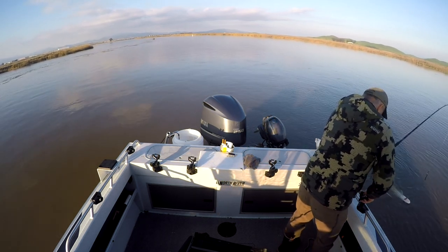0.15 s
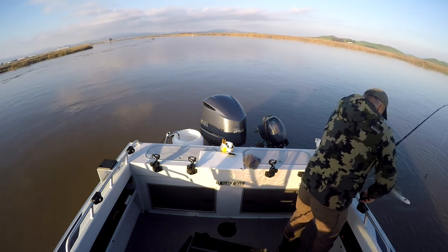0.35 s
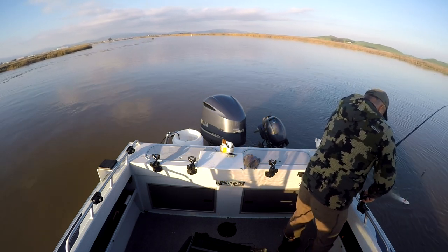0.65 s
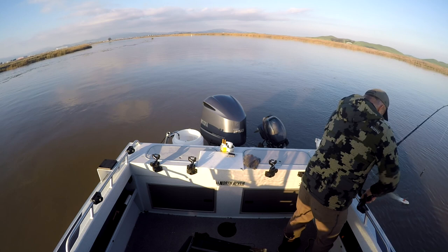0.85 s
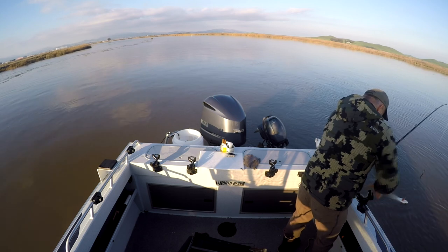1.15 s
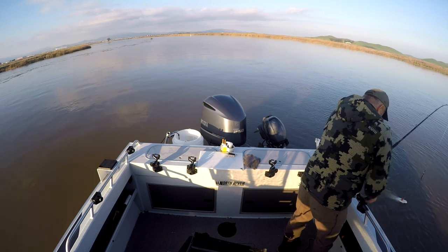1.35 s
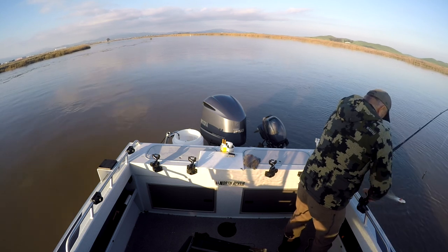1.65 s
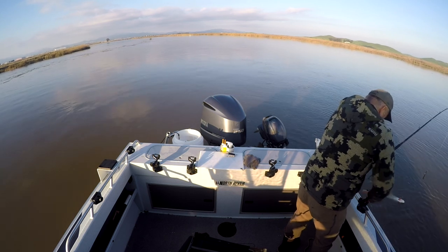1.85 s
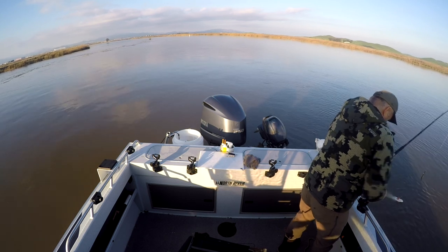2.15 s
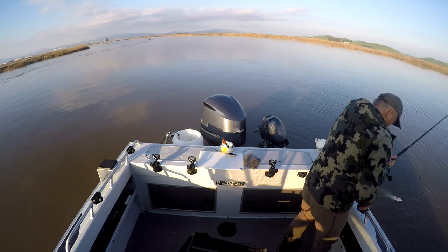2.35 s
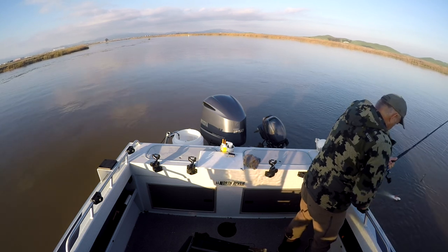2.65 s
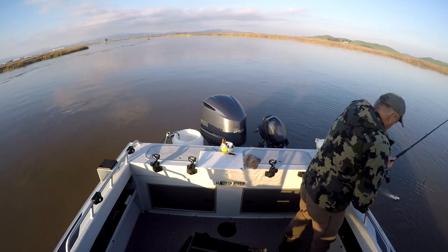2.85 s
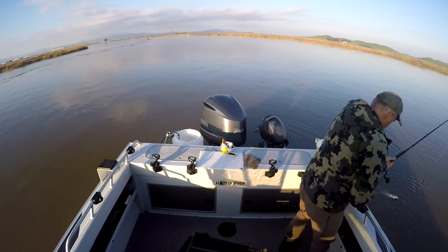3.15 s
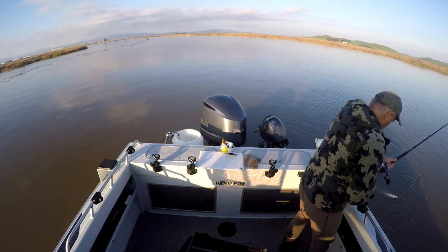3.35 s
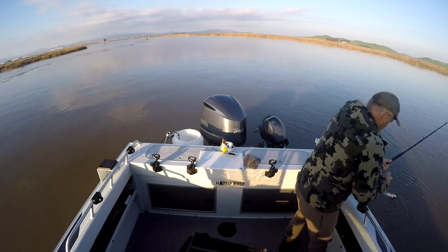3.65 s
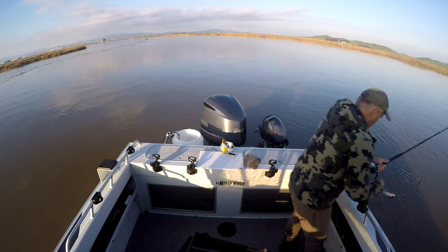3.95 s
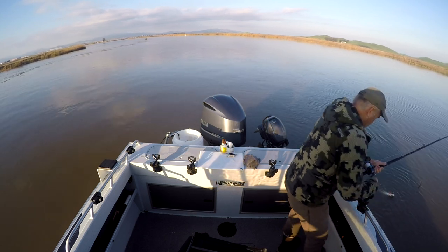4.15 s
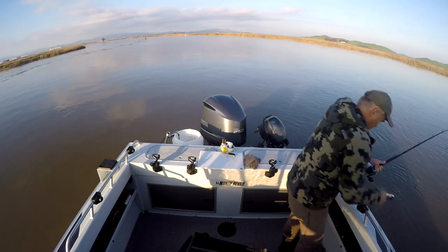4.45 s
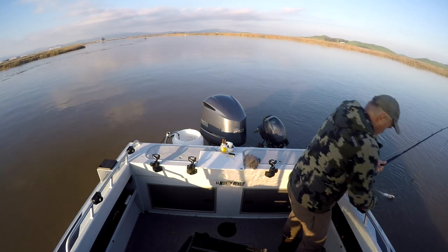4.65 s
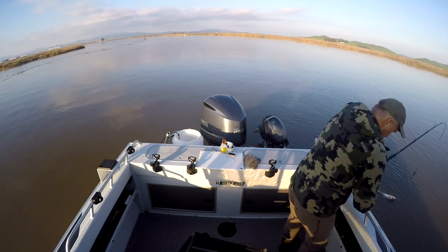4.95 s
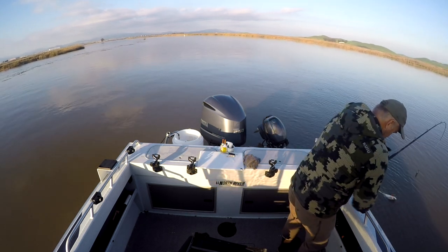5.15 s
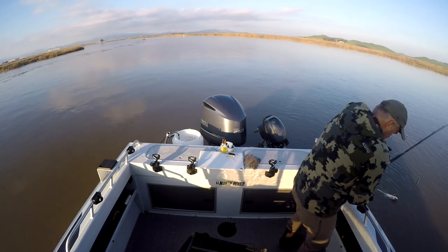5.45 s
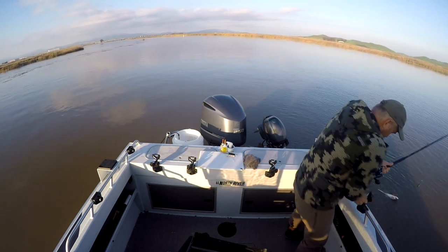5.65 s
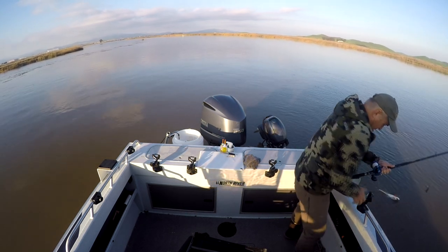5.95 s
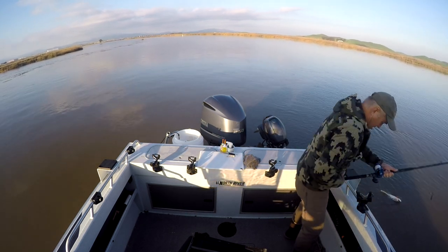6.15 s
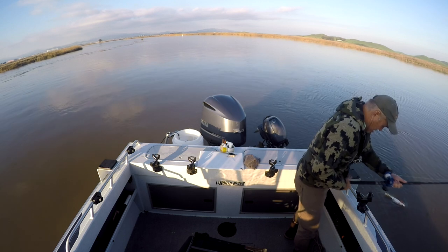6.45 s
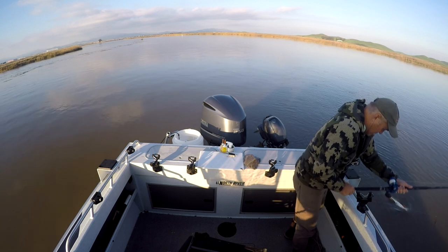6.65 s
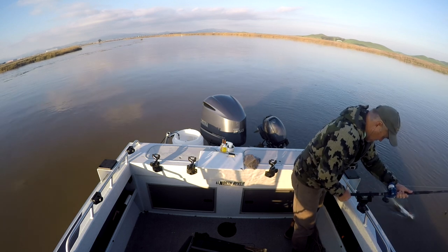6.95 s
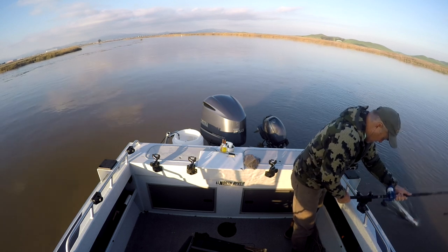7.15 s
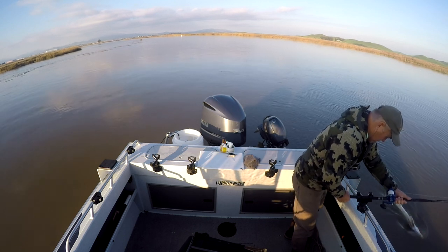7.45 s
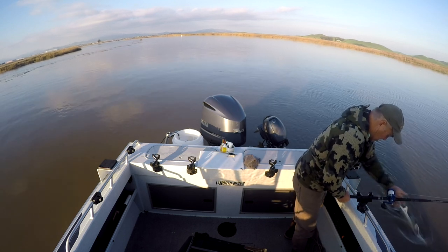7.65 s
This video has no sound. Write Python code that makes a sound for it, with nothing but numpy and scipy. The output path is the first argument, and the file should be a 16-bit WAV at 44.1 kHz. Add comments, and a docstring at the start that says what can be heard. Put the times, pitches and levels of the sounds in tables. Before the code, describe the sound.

Close on an aluminium boat on calm water, a cluster of dull, loud hull knocks opens the scene, then more bangs land irregularly, with a sharp crack just after two seconds. A quieter stretch brings tiny reel clicks, a faint line swish, one low boot thud and a bright snap. Two more strong knocks follow, then jacket rustle and soft late bumps over low rumble and motor hum.

```python
"""On board an aluminium boat on calm water, an angler works at its side.
Something hard bumps the hull again and again: sine modes boom, filtered noise clatters and judders.
His reel clicks with noise snaps and ringing modes, line swishes as narrow noise, a boot thuds as a decaying
sine; uneven noise makes brief scrapes beside the early knocks, then the rustle of his jacket. A small motor
hums in shaft orders, a bird far away whistles arched sine notes, and a limiter ducks the loudest knocks."""
import sys
import numpy as np
from scipy import signal
from scipy.fft import rfft, irfft
from scipy.io import wavfile
from scipy.ndimage import uniform_filter1d

SR = 44100
rng = np.random.default_rng(int(sys.argv[2]) if len(sys.argv) > 2 else 0)


def file_out(sig):
    """Save sig as 16-bit WAV at sys.argv[1]."""
    # one column per channel
    cols = np.atleast_2d(sig).T
    # limit, then scale
    lim = np.clip(cols, -1, 1)
    pcm = np.round(lim * 32767).astype(np.int16)
    wavfile.write(sys.argv[1], SR, pcm)


N = 343539
TIME = np.arange(N) / SR

# Blows on the hull. Each row: start in seconds, strength in dB, extra boom near 190 Hz in dB,
# extra thock of the contact near 380 Hz in dB, bending wave in dB relative to its base level,
# contact time in seconds, extra bite near 3 kHz in dB, pitch of the struck panel in Hz.
BLOWS = [(0, -18, -2, 0, -22, 0.013, -4, 690), (.114, -6.5, 5.5, 4.5, 1.5, 0.037, 6.5, 513),
         (.211, -4.5, -4.5, 8, -24, 0.02, 0, 546), (0.821, -37.5, 14, 5, 9, .021, -4, 380),
         (.858, -41, 14.5, 11, -5, 0.015, -2, 840), (.990, -3.5, 5, -3, -11, .026, 0.5, 497),
         (1.281, -27.5, -4, 3, 6, 0.011, 1.5, 554), (1.323, -31, 0, 19, 4, 0.021, 1, 363),
         (1.358, -32.5, 13.5, 18, 16, 0.029, 10, 319), (1.41, -19, 6, -2.5, 0, 0.034, 0, 360),
         (1.531, -20, 2.5, 13, 5, 0.039, 6.5, 327), (1.552, -19, 8, -2, 2.5, 0.016, -12, 303),
         (1.846, -31, 7, 11.5, -3, 0.035, 8, 326), (2.2331, 3, -2.5, 0, -9.5, .014, 3, 1020),
         (3.51, -47, 19.5, 4, -4.5, 0.033, -12, 378), (5.135, -41, 7, -2, -5, .017, -6, 364),
         (5.32, -35, 15, 17, 13.5, .015, -2, 370), (5.418, -26.5, 7, 1, 0, 0.028, 9, 1120),
         (5.445, 1.5, 3.5, -6, -7, 0.0088, 2.5, 227), (6.149, -.5, -6.5, 3, -19, 0.01, 3, 1010),
         (7.332, -22.5, 5, 7, 10.5, 0.022, 8.5, 460), (7.442, -28, 12.5, 17.5, 6, .014, 5, 250),
         (7.629, -25, 13, 19, 3.5, 0.023, 9, 370), (7.691, -34, 3, 8, 0, 0.01, -1, 1040)]
# Colour of the surfaces rubbing in contact. Each row: frequency in Hz, relative level in dB.
CONTACT_NOISE = [(100, -8.5), (400, 15), (1050, 5), (1450, -5), (1600, -11.5), (2800, -1.5), (4200, -4.5),
                 (4600, -15.5), (7000, -20.5), (11000, -37.5), (15000, -43.5)]


def amp(db):
    """Decibels to gain."""
    return 10 ** (np.asarray(db) / 20)


def unit(x):
    """Scales to rms 1."""
    return x / np.sqrt(np.mean(x ** 2) + 1e-20)


def at_hz(points, hz):
    """Reads a table on a log-frequency axis."""
    f, value = np.transpose(points)
    return np.interp(np.log(hz + 1), np.log(f), value)


def add(mix, s, sound):
    """Mixes a sound in at time s, or at the very start if s is negative."""
    part = mix[max(0, round(s * SR)):][:len(sound)]
    part += sound[:len(part)]


def noise(spectrum, size):
    """Noise of rms 1 with the given spectrum."""
    hz = np.fft.rfftfreq(size, 1 / SR)
    return unit(irfft(rfft(rng.standard_normal(size)) * amp(at_hz(spectrum, hz)), size))


def drift(rate, size=N):
    """Random wander of rms 1, with little movement above the rate in Hz."""
    hz = np.fft.rfftfreq(size, 1 / SR)
    return unit(irfft(rfft(rng.standard_normal(size)) * np.exp(-(hz / rate) ** 2), size))


def colour(x, spectrum, size=4096):
    """Causal minimum-phase filter, so that nothing sounds before a blow."""
    log_gain = np.log(amp(at_hz(spectrum, abs(np.fft.fftfreq(size, 1 / SR)))))
    taps = np.fft.ifft(np.exp(np.conj(signal.hilbert(log_gain)))).real
    return signal.fftconvolve(x, taps[:size // 2])[:len(x)]


def surroundings(air_db=-56, swell_db=1, lap_db=2.0):
    """Low rumble of air and water, and the hull murmuring as it rocks after each blow and slowly settles."""
    # Spectrum of air and water round the boat. Each row: frequency in Hz, relative level in dB per Hz.
    air_spectrum = [(8.8, -46.5), (15, -12), (69, 5.5), (124, -6.5), (147, -6), (248, -16.5), (270, -24),
                    (303, -22), (331, -30), (371, -19), (454, -35.5), (495, -28.5), (701, -38.5),
                    (4210, -45.5), (12500, -53.5), (13400, -76)]
    murmur_db, rock_db, settle_db_per_s = -75, -70.5, 22
    air = noise(air_spectrum, N) * amp(air_db + swell_db * drift(18))
    # noise through the panel modes
    hull = signal.fftconvolve(rng.standard_normal(N), panels(np.arange(SR // 2) / SR))[:N]
    power = amp(murmur_db) ** 2
    for s, db, *_ in BLOWS:
        rocking_db = rock_db + db - settle_db_per_s * abs(TIME - s)
        power = power + (TIME > s) * amp(rocking_db) ** 2
    return air + unit(hull) * np.sqrt(power) * amp(lap_db * drift(18))


def motor(shaft_hz=61, wander=0.0045):
    """Sine orders of a small motor's shaft, their pitch wandering together with its speed."""
    # Loudness of the hum over time. Each row: time in seconds, level of orders 1 and 2 in dB,
    # level of the higher orders in dB, both before each order's own level.
    hum_level = [(0.0, -52, -68.5), (1.58, -52, -61.5), (2.15, -55, -72), (2.799, -65.5, -70),
                 (3.51, -61, -78), (4.768, -64, -66.5), (5.14, -66, -70), (5.62, -53, -68),
                 (5.84, -56.5, -77), (6.513, -64, -72), (7.64, -52.5, -75.5), (7.79, -50.5, -68)]
    # Balance of the shaft orders. Each row: multiple of the shaft rate, relative level in dB.
    orders = [(1, -13), (2, -2.5), (4, 2.5), (5, -14.5), (6, -17.5), (7, -22)]
    turns = np.cumsum(shaft_hz * (1 + wander * drift(3))) / SR
    s, low_db, upper_db = np.transpose(hum_level)
    out = np.zeros(N)
    for k, db in orders:
        level_db = np.interp(TIME, s, low_db if k <= 2 else upper_db)
        out += amp(level_db + db) * np.sin(2 * np.pi * (k * turns + rng.random()))
    return np.sqrt(2) * out  # peak to rms level


def bird(gain_db=-3, quaver=0.004, taper=0.32, echo_s=0.012, echo_db=-5):
    """Thin, quavering whistles from the shore, each one arch of pitch, blurred by an echo off the bank."""
    # The whistled notes. Each row: start in seconds, length in seconds, pitch at the ends in Hz,
    # level in dB before the common gain, bend of the pitch arch as a share (negative dips).
    notes = [(.395, 0.083, 3840, -79, -.003), (0.48, 0.071, 3840, -80, -0.018),
             (5.033, .038, 3950, -82, 0.07), (7.114, 0.032, 3800, -75, 0.136)]
    out = np.zeros(N)
    for s, length, hz, db, arch in notes:
        t = np.arange(0, length, 1 / SR)
        bend = 1 + arch * np.sin(np.pi * t / length)
        pitch = hz * bend * (1 + quaver * drift(200)[:len(t)])
        envelope = amp(gain_db + db) * signal.windows.tukey(len(t), taper)
        note = np.sin(2 * np.pi * np.cumsum(pitch) / SR) * envelope
        add(out, s, note)
        add(out, s + echo_s, amp(echo_db) * note)
    return out


def scuffs_and_rustles(grain_db=2.0, fidget_db=-87):
    """Rubbing in small uneven slips: scrapes, then the jacket, each swelling and fading over a faint rustle."""
    # Colour of the rubbing. Each row: frequency in Hz, relative level in dB.
    rub_spectrum = [(400, 1), (1100, 11.5), (2000, -5), (3400, 8), (5000, -6.5), (11500, -16), (14000, -31)]
    # Soft scuffs and rustles: brief scrapes beside the early knocks, then movements of the jacket.
    # Each row: middle in seconds, width in seconds, peak level in dB.
    strokes = [(0.231, 0.065, -62.5), (1.01, 0.09, -64.5), (1.395, 0.32, -84), (4.617, 0.21, -79.5),
               (5.15, 0.12, -81.5), (5.662, 0.15, -82), (5.888, 0.16, -76), (6.488, 0.25, -74.5),
               (6.716, 0.11, -83), (6.918, 0.17, -75.5)]
    rubbing = amp(fidget_db)
    for s, length, db in strokes:
        rubbing = rubbing + amp(db) * np.exp(-(2 * (TIME - s) / length) ** 2)
    return rubbing * unit(noise(rub_spectrum, N) * amp(grain_db * drift(130)))


def line(width_hz=120):
    """Line slides through the rod's guides: a narrow noise swish whose pitch climbs as it speeds up."""
    # The drawn line. Each row: time in seconds, pitch of its swish in Hz, level in dB.
    pull = [(3.8, 1154, -94), (4.0, 1188, -83), (4.28, 1130, -89), (4.471, 1220, -85.5), (4.568, 1430, -82),
            (4.68, 1590, -78.5), (4.77, 1660, -81), (4.82, 1680, -110)]
    s, hz, db = np.transpose(pull)
    carrier = np.exp(2j * np.pi * np.cumsum(np.interp(TIME, s, hz)) / SR)
    swish = unit((carrier * (drift(width_hz) + 1j * drift(width_hz))).real)
    return np.interp(TIME, s, amp(db), left=0, right=0) * swish


def boot(t60=0.13, rise=0.00095, scuff_t60=0.23, scuff_lead=0.009):
    """The sole scuffs, then the deck flexes under the heel and swings a few times."""
    # Footfalls on the deck. Each row: start in seconds, level of the thud in dB, pitch in Hz,
    # level of the sole's scuff in dB.
    footfalls = [(4.754, -30, 63, -60), (4.793, -34.5, 72.8, -87)]
    # Colour of the scuff. Each row: frequency in Hz, relative level in dB.
    sole = [(100, -29), (700, 8.5), (1500, 0), (2200, -6.5), (3400, 0.5), (5000, -19), (14000, -21)]
    t, out = np.arange(SR // 2) / SR, np.zeros(N)
    for s, db, hz, scuff_db in footfalls:
        scuff = noise(sole, len(t)) * amp(scuff_db - 60 * t / scuff_t60)
        add(out, s - scuff_lead, scuff)
        envelope = amp(db - 60 * t / t60) * (1 - np.exp(-t / rise))
        add(out, s, envelope * np.sin(2 * np.pi * hz * t))
    return out


def reel(ring_db=-6, snap_db=5, snap_t60=0.021, echo_db=-18, echo_t60=0.13, gap_db=-11, soften=0.16,
         fade_s_per_db=0.17):
    """A catch snaps, the reel's frame rings, the cockpit throws a little back; gentle clicks are duller."""
    # Clicks of the reel. Each row: start in seconds, peak level in dB, low body modes in dB,
    # pitch of the catch in Hz.
    clicks = [(3.9143, -53, 14, 2600), (3.974, -62, 11, 3000), (3.983, -59, 13, 3150),
              (4.2325, -54, 15, 3400), (4.367, -56.5, 2, 4050), (4.737, -60, -3, 6300),
              (4.8564, -55, -10, 3600), (4.8648, -30, 9, 3150), (4.87, -40, 7.5, 3000),
              (7.3786, -54, 11, 4070), (7.4834, -63, 4, 4000)]
    # Modes of the frame. Each row: frequency in Hz, relative level in dB, 60 dB decay time in seconds.
    frame_modes = [(1090, -3.5, 0.069), (1413, -2, 0.083), (1895, -9, .1), (2950, -1, .09), (3155, -6, .1),
                   (5238, -6, 0.077)]
    # Colour of the catch's snap. Each row: frequency in Hz, relative level in dB.
    snap_spectrum = [(500, -46), (1000, -9), (2000, -4.5), (3000, 0.5), (5000, -8), (8000, -17.5),
                     (15000, -25)]
    catch_db, catch_width = 5.5, 1.6  # how far the catch's pitch stands out, its width as a ratio
    t, out = np.arange(SR // 4) / SR, np.zeros(N)
    hardest_db = max(row[1] for row in clicks)
    for s, db, body_db, catch_hz in clicks:
        gentle_db = hardest_db - db
        soft_db = soften * gentle_db
        ring = np.zeros(len(t))
        for hz, mode_db, t60 in frame_modes:
            ring += amp(mode_db - 60 * t / t60) * np.sin(2 * np.pi * (hz * t + rng.random()))
        ring = amp(ring_db - soft_db) * ring / abs(ring).max()
        snap_decay = amp(snap_db - 60 * t / snap_t60) + amp(echo_db - 60 * t / echo_t60)
        snap = noise(snap_spectrum, len(t)) * snap_decay
        catch = [(catch_hz / catch_width, -catch_db), (catch_hz, 0), (catch_hz * catch_width, -catch_db)]
        snap = colour(snap, catch)
        # starts at -0.5 and drifts up, through zero for the hardest click; slower for gentle ones
        fade = 0.5 - np.exp(-t / (fade_s_per_db * (1.5 + gentle_db)))
        frame = [(450, -14), (900, body_db), (1550, body_db), (2350, gap_db + 2 * soft_db),
                 (2800, 2.5), (8000, -soft_db)]
        click = colour(fade * (ring + snap), frame)
        add(out, s, amp(db) * click / abs(click).max())
    return out


def panels(t, drag=0.0065, struck_hz=1, focus_db=0, travel=0.0022, swell_share=0.086, scatter=1.0,
           spot_db=1.68):
    """The hull's modes; bending waves are slower at low pitch, so the boom arrives after the clang."""
    # Panel modes. Each row: frequency in Hz, level in dB, 60 dB decay time in seconds (capped below).
    hull_modes = [(142, -33, 0.16), (163.1, -39, 0.62), (184.9, -30, 0.31), (206.8, -30.5, .3),
                  (226.1, -24, 0.29), (253, -39, 0.23), (293.3, -18, 0.15), (323.8, -23.5, .17),
                  (375, -33.5, 0.32), (401.7, -25, 0.21), (424.2, -25.5, .16), (485.7, -22.5, 0.17),
                  (522.5, -26, 0.12), (591, -36.5, 0.22), (610, -27.5, 0.15), (678, -30.5, 0.21),
                  (738.8, -27.5, 0.17), (781, -36.5, 0.19), (816, -34.5, .2), (938.5, -33.5, 0.13),
                  (999, -37.5, 0.15), (1022, -31, 0.12), (1115, -38.5, 0.12), (1194, -44, 0.11),
                  (1360, -44, .18), (1472, -41, 0.13), (1846, -46.5, .18), (2064, -47.5, .18),
                  (2275, -51, 0.076), (2454, -50.5, 0.091), (2780, -44.5, 0.17), (3580, -43, .11),
                  (4320, -52, 0.045)]
    focus_octaves = .08
    out = np.zeros(len(t))
    for hz, db, t60 in hull_modes:
        slowness = np.sqrt(hull_modes[0][0] / hz)  # 1 at the lowest mode
        age = np.maximum(t - travel * slowness, 0)
        # a dragging contact builds the swing up slowly
        swell = 1 - np.exp(-age / (swell_share * drag * slowness))
        # water against the plating damps every mode by 60 dB within 450 cycles
        ring_time = min(t60, 450 / hz)
        near = np.exp(-(np.log2(hz / struck_hz) / focus_octaves) ** 2)
        # each blow lands on a slightly different spot and favours other modes
        mode_db = db + focus_db * near + spot_db * rng.standard_normal()
        size = amp(mode_db - 60 * age / ring_time)
        out += swell * size * np.sin(2 * np.pi * hz * age + scatter * rng.standard_normal())
    return out


def clatter(t, rise=0.00069):
    """Dense weaker modes and rattling fittings as noise, each band dying at its own speed."""
    # Colour of the crowd of modes. Each row: frequency in Hz, relative level in dB.
    crowd = [(60, -7), (130, -7), (300, -12.5), (700, -7), (1100, -9.5), (1450, -10.5), (1550, -17),
             (2700, -15), (4250, -25.5), (4600, -30), (7000, -35.5), (11000, -49), (15000, -68)]
    # How long they ring. Each row: frequency in Hz, 60 dB decay time in seconds.
    ring_times = [(100, 1), (500, 0.45), (1300, 0.21), (3000, 0.17), (6000, 0.11), (12000, 0.036)]
    hz, age, bands = signal.stft(noise(crowd, len(t)), SR, nperseg=256)
    decay = amp(-60 * age / at_hz(ring_times, hz)[:, None])
    ring = signal.istft(bands * decay, SR)[1][:len(t)]
    return ring * (1 - np.exp(-t / rise))


def chatter(t, drag, rise_share=0.077, stop=1.29, judder_db=4, judder_rate=350):
    """The surfaces judder against each other unevenly for as long as the contact drags, then part."""
    judder = amp(judder_db * np.tanh(drift(judder_rate, len(t))))
    taps = unit(noise(CONTACT_NOISE, len(t)) * judder)
    return taps * (1 - np.exp(-t / (rise_share * drag))) * np.exp(-(t / drag) ** stop)


def flex(t, start_hz=247.4, end_hz=99.7, sink_s=.08, level_db=-29.5, peak_s=0.06):
    """A bending wave runs along the plating, its lower pitches arriving later, so its boom sinks."""
    hz = end_hz + (start_hz - end_hz) * np.exp(-t / sink_s)
    swell = (t / peak_s) ** 3 * np.exp(3 - 3 * t / peak_s)  # reaches 1 at peak_s
    return amp(level_db) * swell * np.sin(2 * np.pi * (np.cumsum(hz) / SR + rng.random()))


def knocks(panel_db=-1.0, clatter_db=-32, chatter_db=-26, loosen=0.15, after_db=-45, after_t60=1.0,
           body_hz=380, graze_db=-42, graze=0.005, drag_share=0.9, push_share=.09):
    """Every blow rings the same hull; a long contact is dull, a short one cracks, a strong one rattles more."""
    # Faint, long after-ring of the whole boat. Each row: frequency in Hz, relative level in dB.
    after_ring = [(60, -19.5), (160, 19.5), (400, 1.5), (800, -7), (1400, -21), (2000, -32), (3000, -35),
                  (8000, -58.5)]
    t, out = np.arange(SR) / SR, np.zeros(N)
    fittings = clatter(t)
    for s, db, boom_db, body_db, flex_db, contact_s, bite_db, struck_hz in BLOWS:
        drag = drag_share * contact_s
        # a longer contact is softer: clang near 1.2 kHz and crack near 3 kHz fall
        clang_db = 7 - 500 * contact_s
        crack_db = 2 - 660 * contact_s
        after = noise(after_ring, len(t)) * amp(after_db - 60 * t / after_t60) * (1 - np.exp(-t / 0.078))
        # a light blow favours the panel it lands on more than a hard one does
        focus_db = 4 - 0.12 * db
        plating = amp(panel_db) * panels(t, drag, struck_hz, focus_db)
        ring = plating + amp(clatter_db + loosen * db) * fittings + after
        contact = [(100, 0), (190, boom_db), (280, 0), (640, 0), (1200, clang_db),
                   (3000, crack_db + bite_db)]
        push = 1 - np.exp(-t / (push_share * contact_s))  # a soft contact loads the hull gradually
        thock = colour(chatter(t, drag), [(220, 0), (body_hz, body_db), (620, 0)])
        add(out, s, amp(db) * colour(push * ring + amp(chatter_db) * thock, contact))
        add(out, s, amp(db + flex_db) * flex(t))
        # the surfaces begin to graze a moment before the full weight lands
        graze_swell = (t / graze) ** 2 * np.exp(2 - 2 * t / graze)
        touch = noise(CONTACT_NOISE, len(t)) * graze_swell
        add(out, s - graze, amp(db + graze_db) * colour(touch, contact))
    return out


def scene():
    """All sources at the one microphone."""
    background = surroundings() + motor() + bird()
    handling = scuffs_and_rustles() + line() + boot() + reel()
    return (background + handling + knocks())[None]


def record(dry, threshold_db=-20.5, recovery_db=18, ceiling_db=-15, edge_hz=15400):
    """A limiter ducks the hardest knocks and recovers steadily, peaks are rounded, then the treble is cut."""
    power_db = 10 * np.log10(abs(uniform_filter1d(dry[0] ** 2, size=400)) + 1e-12)
    fall = TIME * recovery_db  # recovery in dB per second
    excess_db = np.maximum(power_db - threshold_db, 0)
    duck_db = np.maximum.accumulate(excess_db + fall) - fall
    ducked = dry * amp(-duck_db)
    overload = ducked / amp(ceiling_db)
    held = ducked / (1 + overload ** 6) ** (1 / 6)
    lowpass = signal.firwin(511, edge_hz, window=("kaiser", 9), fs=SR)
    return signal.oaconvolve(held, lowpass[None], "same")


dry = scene()
out = record(dry)
file_out(out)
```